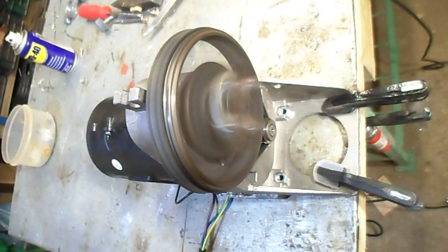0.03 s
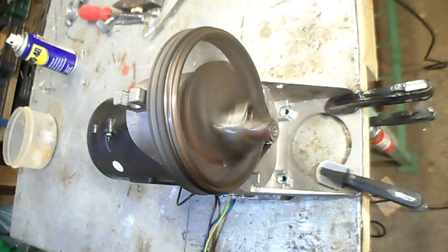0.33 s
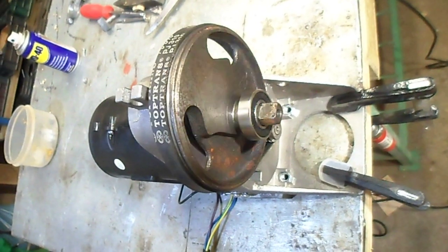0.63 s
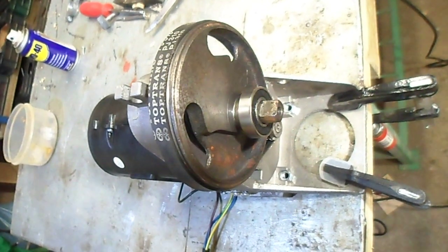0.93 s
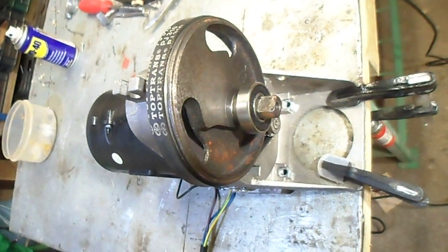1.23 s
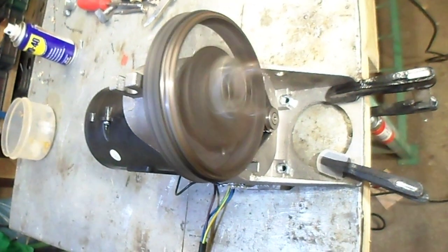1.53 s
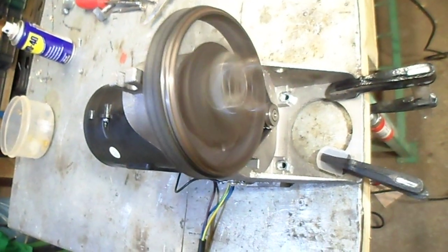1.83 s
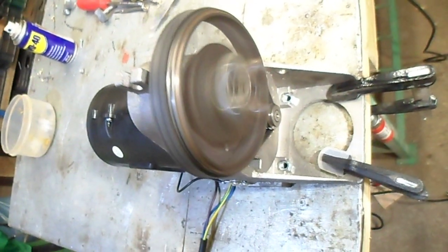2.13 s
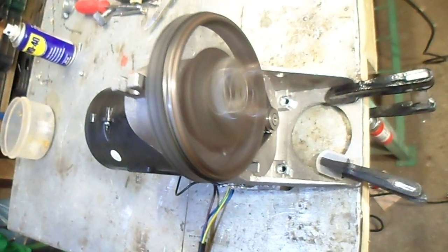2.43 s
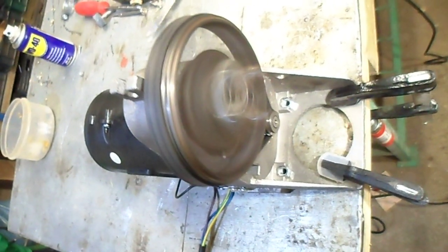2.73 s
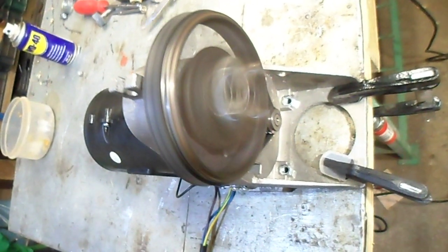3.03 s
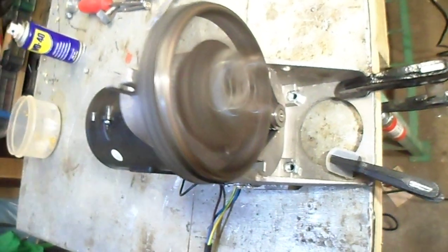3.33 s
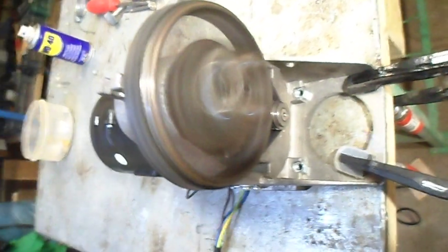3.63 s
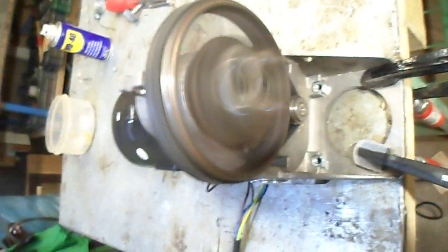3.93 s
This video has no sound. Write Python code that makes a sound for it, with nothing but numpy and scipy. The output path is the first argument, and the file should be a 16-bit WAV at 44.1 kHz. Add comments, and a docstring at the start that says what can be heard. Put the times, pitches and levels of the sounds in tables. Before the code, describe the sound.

A pulley motor whirs down, pauses, then jolts back into a steady hum.

```python
"""A quiet workshop, one microphone close to the bench, where a brush motor with a large pulley is clamped.
The motor coasts to rest with a dry whirr and a few last brush ticks. A switch clicks, the motor kicks
against the bench and its brushes spark at twice the mains rate while it runs up. At full speed the
sparking eases and the bench hums on the second and fourth multiples of the shaft rate."""
import sys
import numpy as np
from scipy import signal
from scipy.fft import rfft, irfft
from scipy.io import wavfile

SR = 44100
rng = np.random.default_rng(int(sys.argv[2]) if len(sys.argv) > 2 else 0)


def to_wav(sig):
    """Store sig (one row per channel, or 1-D mono) as 16-bit WAV at the path in sys.argv[1].

    Samples outside -1..1 are clipped; the rate is SR.
    """
    pcm = np.clip(np.atleast_2d(sig), -1, 1) * 32767
    pcm = np.round(pcm).astype(np.int16)
    wavfile.write(sys.argv[1], SR, pcm.T)  # frames by channels


N = 176400
TIME = np.arange(N) / SR
STOP_S, SWITCH_S, START_S = .8, 1.5605, 1.611
MAINS_HZ, SPARK_PEAK_S = 50, .0051


def from_db(db):
    """Decibels to gain."""
    return 10 ** (np.asarray(db) / 20)


def unit_rms(x):
    """Scale to unit power."""
    return x / np.sqrt(np.mean(x ** 2) + 1e-20)


def in_time(rows):
    """Each column of a curve, sample by sample."""
    times, *columns = np.transpose(rows)
    return [np.interp(TIME, times, column) for column in columns]


def colour(x, spectrum):
    """Shape a sound by a spectrum, rolled off below 20 Hz; unit power."""
    hz, db = np.transpose(spectrum)
    bins = np.maximum(np.arange(N + 1) * SR / (2 * N), 1)
    gain = from_db(np.interp(np.log(bins), np.log(hz), db))
    low_cut = bins ** 2 / (bins ** 2 + 20 ** 2)
    return unit_rms(irfft(rfft(x, 2 * N) * gain * low_cut)[:N])


def drift(hz):
    """Smooth random wandering with unit spread."""
    pole = np.exp(-80 * np.pi * hz / SR)
    slow = signal.lfilter([1], [1, -2 * pole, pole * pole], rng.standard_normal(N // 40 + 2002))[2000:]
    return np.interp(np.arange(N) / 40, np.arange(len(slow)), unit_rms(slow))


def resonate(x, hz, width_hz, wander_hz=0):
    """One resonance with unit gain at its top, whose centre may wander."""
    pole = np.exp(-np.pi * width_hz / SR)
    carrier = np.exp(2j * np.pi * np.cumsum(hz + wander_hz * drift(8.9)) / SR)
    return 2 * np.real(carrier * signal.lfilter([1 - pole], [1, -pole], x / carrier + 1e-18))


def narrow_noise(hz, width_hz):
    """Noise twice through one resonance: a rough tone of unit power."""
    return unit_rms(resonate(resonate(rng.standard_normal(N), hz, width_hz), hz, width_hz))


def grit(rough_db, hz):
    """Friction noise whose strength jumps about."""
    return unit_rms(rng.standard_normal(N) * from_db(rough_db * drift(hz)))


def burst(start_s, attack_s, decay_s):
    """A straight rise and an exponential fall."""
    age = TIME - start_s
    return np.clip(age / attack_s, 0, 1) * np.exp(-np.clip((age - attack_s) / decay_s, 0, 100))


def swell(centre_s, width_s):
    """A bell-shaped rise and fall."""
    return np.exp(-np.minimum(((TIME - centre_s) / width_s) ** 2, 100))


# workshop air spectrum: f/Hz, level/dB
AIR = [(25, 5), (130, -5), (250, -11.5), (1100, -16), (10000, -32), (11200, -42)]

def workshop():
    """Quiet air all round, a thin throbbing whine and a brief faint tone while the motor rests."""
    air = from_db(-62) * colour(rng.standard_normal(N), AIR)
    throb = unit_rms(1 + .8 * np.sin(2 * np.pi * 59.5 * TIME))
    whine = from_db(-75) * narrow_noise(hz=8030, width_hz=480)
    phase = 2 * np.pi * 1100 * TIME + drift(15)
    tone = from_db(-69) * swell(1.09, .21) * (np.sin(phase) + .42 * np.sin(2 * phase))
    return air + throb * whine + tone


def reflections(x, span_s=.025, level_db=-12):
    """Weak echoes off the bench and nearby things reach the microphone just after the direct sound."""
    lag = rng.random(60)
    taps = rng.standard_normal(60) * np.exp(-2 * lag)
    response = np.zeros(SR // 10)
    np.add.at(response, (lag * span_s * SR).astype(int) + 20,
              from_db(level_db) * taps / np.linalg.norm(taps))
    response[0] = 1
    return signal.fftconvolve(x, response)[:N]


# motor housing resonances: f/Hz, width/Hz, level/dB
HOUSING_MODES = [(1148, 90, 1.5), (4675, 105, 12), (8110, 240, 6), (8970, 170, 8)]

def housing(x):
    """The housing adds its wandering resonances to a noise, heard with near echoes; unit power."""
    ringing = sum(from_db(db) * resonate(x, hz, width, wander_hz=12) for hz, width, db in HOUSING_MODES)
    return unit_rms(reflections(x + ringing))


# coasting: t/s, whirr level/dB, rolling tone level/dB, brush groan level/dB
COAST_LEVELS = [(0, -39, -45, -58), (.17, -41, -41, -53), (.27, -43, -52.5, -56), (.5, -47.5, -83, -60.5),
                (.67, -56, -79, -53), (.79, -60, -90, -64.5)]
# whirr spectrum: f/Hz, level/dB
WHIRR_SPECTRUM = [(50, 1), (160, 8), (300, -5.5), (600, -1), (900, 3), (1200, 1), (1700, -8), (2600, -3),
                  (3100, -8), (5500, -9), (6200, -16.5), (7500, -13.5), (10200, -22), (11200, -36)]

def coasting(roll_hz=156, groan_hz=870):
    """Friction slows the pulley evenly: whirr and bearing ring fade, a tone falls, the brushes groan."""
    whirr_gain, roll_gain, groan_gain = from_db(in_time(COAST_LEVELS))
    whirr = housing(colour(grit(rough_db=1, hz=40), WHIRR_SPECTRUM))
    ring = from_db(-10) * np.clip((STOP_S - TIME) / .17, 0, 1) * narrow_noise(hz=4595, width_hz=110)
    roll_phase = 2 * np.pi * np.cumsum(roll_hz * np.clip(1 - TIME / STOP_S, 0, 1)) / SR
    roll = roll_gain * unit_rms(np.sin(roll_phase) * from_db(2 * drift(24)))
    groan_phase = 2 * np.pi * groan_hz * TIME
    low_octave = from_db(-53.5) * swell(.518, .043) * np.sin(groan_phase / 2)
    groan = groan_gain * unit_rms(np.sin(groan_phase + .79 * drift(60)) * from_db(2 * drift(40)))
    groan *= np.exp(-np.maximum(TIME - STOP_S, 0) / .025)
    turning = np.clip((STOP_S - TIME) / .046 + .5, 0, 1)
    return turning * (whirr_gain * (whirr + ring) + roll + low_octave) + groan


# last brush ticks: t/s, relative level/dB
BRUSH_CATCHES = [(0.574, -45.5), (0.587, -45), (0.69, -47.5), (0.718, -56), (0.7347, -45), (0.7506, -47),
                 (0.7703, -44), (0.7863, -44.5), (.797, -52)]
# spectrum of a catching brush: f/Hz, level/dB
CATCH_SPECTRUM = [(1500, -14.5), (4700, -8), (6200, -20), (7900, 2.5), (9500, -8.5), (11500, -25)]

def brush_ticks():
    """The brushes catch on the last commutator bars."""
    catches = sum(from_db(db) * burst(t, attack_s=.0025, decay_s=.0026) for t, db in BRUSH_CATCHES)
    return from_db(-1) * catches * colour(rng.standard_normal(N), CATCH_SPECTRUM)


# switch click spectrum: f/Hz, level/dB
CLICK_SPECTRUM = [(400, -17), (800, -2), (1400, -4), (6500, -10), (9000, -36)]

def switch_click(case_hz=800):
    """A small dry click and a hollow knock from the switch's case, just before the current flows."""
    click = from_db(-48) * burst(SWITCH_S, attack_s=.0008, decay_s=.003)
    knock = from_db(-50) * burst(SWITCH_S, attack_s=.002, decay_s=.006)
    noise = colour(rng.standard_normal(N), CLICK_SPECTRUM)
    return click * noise + knock * np.sin(2 * np.pi * case_hz * TIME)


# spectrum of the starting knocks and, later, the brush rasp: f/Hz, level/dB
RASP_SPECTRUM = [(200, -7), (1350, 1.5), (1750, -1), (2850, 0.5), (3400, -6.5), (5800, -11.5), (10200, -23),
                 (11200, -39)]

def kick(jolt_hz=106):
    """The motor jolts the bench, its slack closes with two knocks and the brushes chirp loose."""
    jolt = from_db(-14.5) * burst(START_S + .0031, attack_s=.0203, decay_s=.011)
    jolt *= np.sin(2 * np.pi * jolt_hz * (START_S - TIME))
    knocks = sum(from_db(db) * burst(START_S + delay_s, attack_s=.00055, decay_s=.0008)
                 for delay_s, db in [(0, -31), (.0125, -21.5)])
    chirp = from_db(-31.5) * swell(1.686, .012) * colour(rng.standard_normal(N), CATCH_SPECTRUM)
    return jolt + knocks * housing(colour(rng.standard_normal(N), RASP_SPECTRUM)) + chirp


def magnetic_buzz():
    """The starting current buzzes on even multiples of the mains, then settles to a trace."""
    current = burst(START_S, attack_s=.038, decay_s=.19) + .051
    buzz = sum(from_db(db) * np.sin(2 * np.pi * k * MAINS_HZ * TIME)
               for k, db in [(2, -39), (4, -31), (6, -47)])
    return np.sqrt(2) * current * buzz


# bench hum: t/s, 2nd multiple level/dB, 4th multiple level/dB, gain on the weak multiples/dB
HUM_LEVELS = [(1.72, -67, -73, -25), (1.87, -38, -37.5, -22), (2.01, -33, -29.5, -2.5), (2.2, -28, -30, 0),
              (2.5, -31, -23.5, 2.5), (2.96, -32, -22, 0), (4, -32, -22.5, -4)]
# weak partials: multiple of the shaft rate
WEAK_MULTIPLES = [5, 6, 10, *range(12, 28, 2)]
# the same partials: relative level/dB
WEAK_LEVELS = [-42.5, -48, -42.5, *[-51.5] * 8]

def bench_hum(angle):
    """The turning pulley shakes the bench at multiples of the shaft rate."""
    second, fourth, weak = from_db(in_time(HUM_LEVELS))
    hum = second * np.sin(2 * angle) - fourth * np.cos(4 * angle)
    for k, db in zip(WEAK_MULTIPLES, WEAK_LEVELS):
        gain = weak * from_db(db + 3.5 * drift(9.4))
        hum += gain * np.sin(k * (angle + .071 * drift(7.5)) + 2 * np.pi * rng.random())
    return np.sqrt(2) * hum


def mains_pulse(sharpness, steady):
    """A surge on each half cycle of the mains above a steady share; unit power."""
    phase = 2 * np.pi * 2 * MAINS_HZ * (TIME - SPARK_PEAK_S)
    return unit_rms(steady + np.exp(sharpness * (np.cos(phase) - 1)))


# under power: t/s, bearing rumble level/dB, brush rasp level/dB, sparking level/dB
DRIVE_LEVELS = [(1.61, -25.5, -40.5, -64), (1.66, -29, -28.5, -63), (1.7, -29.5, -29.5, -34.5),
                (2.02, -31.5, -31.5, -34.5), (2.25, -29, -33.5, -40), (2.55, -33, -36.5, -49.5),
                (3.2, -34, -38.5, -50), (4, -32, -37.5, -54)]
# bearing rumble spectrum: f/Hz, level/dB
RUMBLE_SPECTRUM = [(25, -12), (140, 1), (250, -2), (400, -0.5), (500, -4.5), (860, 0.5), (1300, -0.5),
                   (1650, -14), (6000, -47)]
# sparking spectrum: f/Hz, level/dB
SPARK_SPECTRUM = [(600, 1), (2500, -7.5), (4000, -1.5), (6600, -3.5), (7600, -3.5), (10300, -15),
                  (11200, -40)]

def running(angle, whine_multiple=208, race_multiple=94.85):
    """Bearings rumble and sing, parts rattle; brushes rasp, whine and spark with each current surge."""
    rumble_gain, rasp_gain, spark_gain = from_db(in_time(DRIVE_LEVELS))
    surge = mains_pulse(sharpness=2.6, steady=.069)
    whine_phase = whine_multiple * angle
    whine = from_db(-8.5) * surge * (drift(100) * np.sin(whine_phase) + drift(100) * np.cos(whine_phase))
    throb = unit_rms(1 + .11 * np.sin(2 * angle))
    rolling = grit(rough_db=1, hz=93) * throb * mains_pulse(sharpness=3.8, steady=5.9)
    rumble = rumble_gain * housing(colour(rolling, RUMBLE_SPECTRUM))
    rubbing = grit(rough_db=1.5, hz=240) * mains_pulse(sharpness=.24, steady=5.2)
    rasp = rasp_gain * housing(colour(rubbing, RASP_SPECTRUM))
    rattle = loose_parts()
    # the bearing sings under the starting load
    sing_gain = spark_gain * from_db(-11) + from_db(-34) * swell(1.705, .02)
    sing = sing_gain * np.sqrt(surge) * narrow_noise(hz=4580, width_hz=420)
    ball_race = from_db(-57) * unit_rms(drift(11) * np.sin(race_multiple * angle))
    sparks = housing(colour(grit(rough_db=3, hz=320) * surge, SPARK_SPECTRUM))
    return rumble + rasp + sing + ball_race + spark_gain * (sparks + whine + rattle)


# loose parts: f/Hz, width/Hz, level/dB relative to the sparking
RATTLE_MODES = [(1200, 220, -2), (2700, 450, -6.5)]

def loose_parts(scuffs_per_s=130, decay_s=.005):
    """Short scuffs at random moments excite each loose part's shifting resonance."""
    rattle = np.zeros(N)
    for hz, width, db in RATTLE_MODES:
        hits = (rng.random(N) < scuffs_per_s / SR) * rng.uniform(.5, 1, N)
        power = signal.lfilter([1], [1, -np.exp(-1 / (decay_s * SR))], hits + 1e-18)
        scuffs = resonate(np.sqrt(power) * rng.standard_normal(N), hz, 2 * width)
        rattle += from_db(db) * unit_rms(resonate(scuffs, hz, width, wander_hz=90))
    return rattle


# shaft rate under power: t/s, f/Hz
SHAFT_RATE = [(1.61, 5), (1.72, 23.5), (1.8, 27.7), (1.9, 29.5), (2.25, 31.95), (2.65, 32.75), (4, 32.6)]

def scene():
    """From beside the bench, in mono: the motor coasts, rests and restarts."""
    shaft_hz, = in_time(SHAFT_RATE)
    angle = 2 * np.pi * np.cumsum(shaft_hz) / SR
    powered = np.clip((TIME - START_S) / .0011, 0, 1)
    motor = coasting() + brush_ticks() + switch_click() + kick()
    motor += powered * (magnetic_buzz() + bench_hum(angle) + running(angle))
    return (workshop() + motor)[None]


def record(dry):
    """The microphone's signal is cut steeply above 12 kHz."""
    return signal.sosfilt(signal.ellip(10, .1, 80, 12000, fs=SR, output="sos"), dry)


dry = scene()
out = record(dry)
to_wav(out)
```